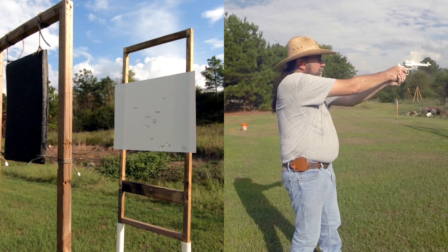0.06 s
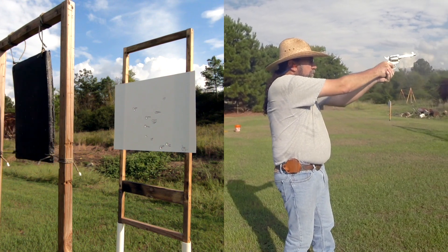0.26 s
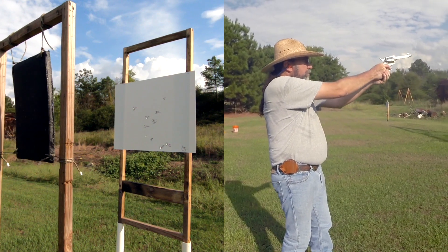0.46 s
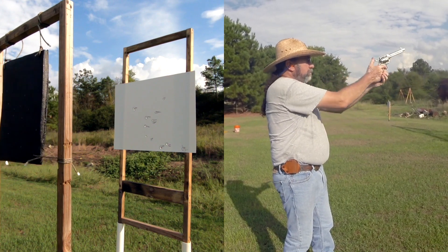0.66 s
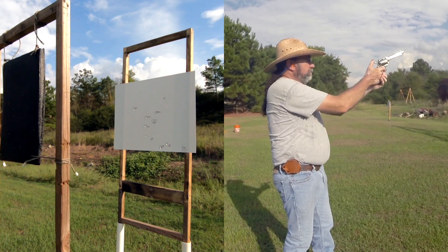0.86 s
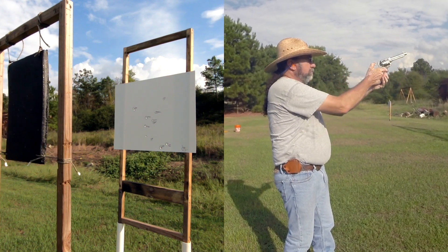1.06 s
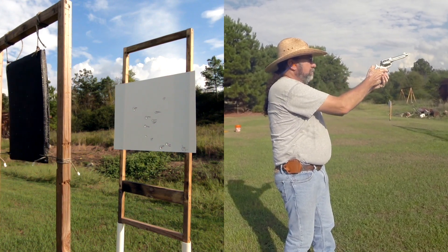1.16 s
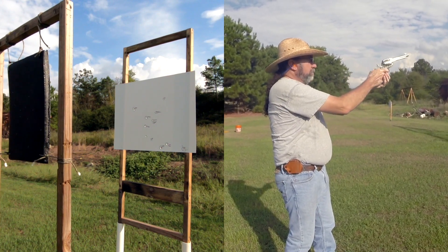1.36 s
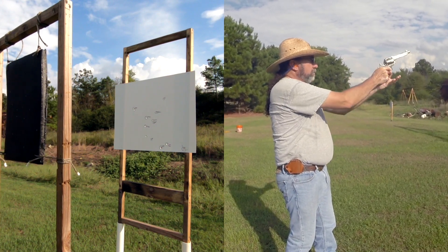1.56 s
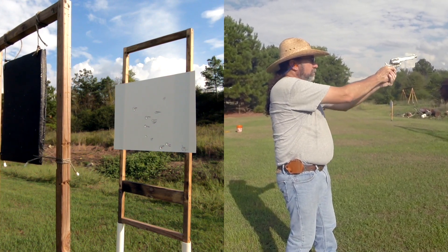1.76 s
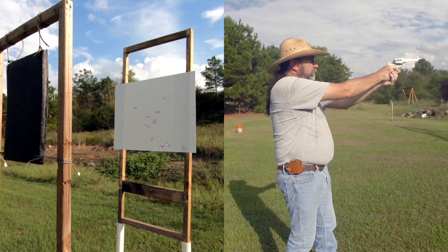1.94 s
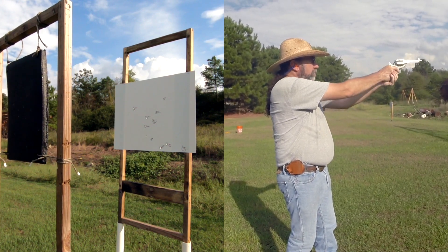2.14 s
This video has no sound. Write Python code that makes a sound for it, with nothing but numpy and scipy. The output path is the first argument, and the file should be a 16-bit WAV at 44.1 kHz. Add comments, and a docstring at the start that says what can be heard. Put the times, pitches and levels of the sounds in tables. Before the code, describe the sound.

One heavy handgun blast on an open range, rough rolling echoes, then faint metallic hammer cocking

```python
"""On an open range, one shot from a large revolver is heard a few metres from a mono camera microphone.
A shock pulse and decaying gas noise form the blast, which a ground reflection and a low roll follow.
Nearby objects return filtered fronts with noise smears; the tree line returns sparse, fading impulses.
Four soft thuds precede the shot; later the hammer is cocked, as damped steel modes with scraping noise.
Filtered noise makes wind, hiss and insects; the recorder ducks, recovers slowly and clips."""
import sys
import numpy as np
from scipy import signal
from scipy.fft import rfft, irfft, next_fast_len
from scipy.io import wavfile
from scipy.ndimage import minimum_filter1d, map_coordinates

SR = 44100
rng = np.random.default_rng(int(sys.argv[2]) if len(sys.argv) > 2 else 0)


def bounce(signal):
    """Save signal as a 16-bit WAV file at the path given by the first command-line argument."""
    frames = np.transpose(np.atleast_2d(signal))
    limited = np.clip(frames, -1, 1)
    pcm = np.round(limited * 32767).astype(np.int16)
    wavfile.write(sys.argv[1], SR, pcm)


N = 97020  # 2.2 s

# Blast colour [f/Hz, level/dB]
BLAST_COLOUR = [(30, 6), (100, 2.5), (220, -3.5), (360, 3), (600, 0), (1000, -1.5), (1600, -9), (2400, 0.5),
                (6000, -4.5), (15000, -32.5)]
# Camera-body modes, relative to the blast [f/Hz, level/dB, T60/s]
BODY_MODES = [(86, -21, 0.017), (363, -7.5, 0.016), (671, -12.5, 0.027), (998, -7.5, 0.02),
              (2260, -15, 0.014)]
# Reflection response of the grassy ground [f/Hz, level/dB]
GROUND_RESPONSE = [(1000, 1), (2500, 1), (10000, -19)]
# Colour of the low roll over the ground [f/Hz, level/dB]
ROLL_COLOUR = [(30, -33), (100, -16.5), (190, -3.5), (300, -10), (600, -24), (2000, -26), (12000, -31)]
# Echoes of distinct objects; level before decay and filtering [t/s, level/dB, reference f/Hz, T60/s]
OBJECT_ECHOES = [(0.2611, 1.5, 752, 0.014), (0.2667, 2, 546, 0.0067), (0.271, -14, 850, .02),
                 (0.3193, -13, 1050, 0.0079), (0.3366, -5, 814, .008), (0.369, -9, 1090, 0.015),
                 (0.3776, -0.5, 1010, 0.004), (.392, -2, 1220, 0.012), (0.416, -4, 1084, 0.043),
                 (0.4275, -22, 1030, 0.025), (0.4707, -13, 1200, 0.039), (0.498, -10, 1180, 0.049),
                 (.513, -8.5, 660, 0.014), (0.53, -4, 560, 0.0067), (.542, -5, 565, 0.056),
                 (.593, -9, 748, 0.032), (.640, -7.5, 490, 0.017), (.654, -11, 583, 0.027),
                 (.692, -12.5, 700, 0.1), (0.726, -10, 496, 0.024), (0.738, -12, 1040, 0.024),
                 (0.791, -20.5, 543, 0.068), (0.8579, -9, 1500, .012), (0.8867, -13, 940, 0.028),
                 (.936, -15, 1000, .035), (.970, -16, 800, .04), (1.026, -18, 1400, .02),
                 (1.149, -18.5, 860, 0.018), (1.482, -28.5, 1020, 0.013), (1.741, -31, 980, .025)]
# Echo spectrum about its reference pitch [multiple of reference f, level/dB]
ECHO_SPECTRUM = [(.2, -26), (.55, -18), (.85, 7.5), (1.2, 2.5), (1.6, -8), (2.3, -11.5), (4, -18), (8, -20),
                 (16, -49)]
# Treble loss on the way back [f/Hz, level/dB]
ECHO_TREBLE_LOSS = [(2500, 0), (6000, -7.5), (10000, -20), (15000, -20)]
# Arrival of the tree scatter, relative to TREES_DB and before the fade [t/s, level/dB]
TREE_ARRIVAL = [(.23, -7), (.30, -20), (.35, -16.5), (.40, -3.5), (.44, -4), (.485, -7.5), (.52, 0.5),
                (.62, 0), (.86, 3.5), (1.15, 1.5), (1.5, -1), (2.2, 2.5)]
# Colour of the tree scatter [f/Hz, level/dB]
TREE_COLOUR = [(60, -15.5), (180, -13.5), (280, -21), (500, -5), (750, -4), (1080, 2), (1450, -8.5),
               (1900, -6.5), (2500, -8), (3100, -15), (3800, -14), (6500, -16.5), (9500, -31), (15000, -68)]
# Fade of the tree scatter, fastest in the treble through air absorption [f/Hz, fade/(dB/s)]
TREE_FADE = [(150, 27), (500, 24.7), (1000, 20.7), (2000, 25.4), (4000, 35.3), (8000, 52)]
# Cocking clicks, with the lower edge of the passband [t/s, level/dB, f/Hz]
COCKING_CLICKS = [(1.1924, -25.5, 4950), (1.2604, -27.5, 2860)]
# Steel-frame modes, relative to the click and before its filter [f/Hz, level/dB, T60/s]
STEEL_MODES = [(3230, 3.5, 0.021), (4550, -9.5, 0.044), (5240, 1, .016), (6140, -2, 0.022),
               (7843, -9, 0.015), (9120, -4.5, 0.02), (11000, -12, 0.018), (13900, -22, .04)]
# Soft thuds before the shot [t/s, peak level/dB]
THUDS = [(0.1011, -30), (0.1111, -19), (0.1228, -18.5), (0.1329, -17.5)]
# Colour of a thud [f/Hz, level/dB]
THUD_COLOUR = [(40, -9), (130, 1), (400, -2.5), (850, -0.5), (1300, -28), (4000, -21), (6000, -40),
               (15000, -54)]
# Wind level at the microphone, before its random wobble [t/s, level/dB]
WIND_LEVEL = [(0, -36.5), (.12, -32), (.19, -41.5), (.29, -53), (.45, -35), (.9, -41), (1.25, -39),
              (1.38, -40), (1.47, -39), (1.62, -42), (1.79, -33), (1.84, -47), (1.95, -39.5), (2.05, -36),
              (2.2, -41.5)]
# Relative spectrum of the wind [f/Hz, level/dB]
WIND_COLOUR = [(15, 1.5), (40, -3), (80, -4), (150, -12.5), (300, -22.5), (800, -48), (3000, -62)]
# Relative spectrum of the field hiss [f/Hz, level/dB]
HISS_COLOUR = [(50, 14), (250, 17), (500, 14), (1000, 9.5), (2000, 3), (3500, -2), (6000, -5), (9000, -4),
               (12500, -7.5), (15000, 7), (15600, -12)]
# Relative spectrum of the insects [f/Hz, level/dB]
INSECT_COLOUR = [(5500, -31), (7300, -4), (8200, -8), (9000, 3), (9800, -8), (12000, -11), (15000, -25)]
# Top-end response of the recorder [f/Hz, level/dB]
RECORDER_TREBLE = [(9000, 0), (13000, -2.5), (15000, -13), (16200, -7)]

# Blast: gas and wash levels are relative to the shock, before the common colour
SHOT_S, SHOT_DB = 0.2288, 22.5
PUSH_S = 0.00044  # overpressure time
GAS_DB, GAS_T60_S = -9, 0.019  # turbulent muzzle gas
WASH_DB, WASH_T60_S = -48.5, 0.38  # scatter off the grass
BOUNCE_DELAY_S, BOUNCE_DB = 0.003, -4.5
ROLL_DB, ROLL_RISE_S, ROLL_T60_S = -18.5, 0.12, 0.87  # level before the swell
# Reflections
FRONT_SHARE = 0.077  # fraction of an echo's energy in its clean front
TREES_DB, FADE_START_S = -13, 0.41
TWIGS_PER_S, TREE_FLUTTER_DB = 5000, 1
# Cocking
SCRAPE_DB, SCRAPE_T60_S, CLICK_RISE_S = 10.5, 0.014, 0.0012
# Background
HISS_DB, INSECTS_DB, INSECT_FLUTTER_DB = -43.5, -53, 3
# Recorder
THRESHOLD_DB, DEEPEST_DB = -5, 15
GAIN_TIME_CONSTANT_S, HOLD_S, RECOVER_DB_PER_S = 0.00435, 0.39, 22.5
CEILING, TOP_HZ = 0.97, 16200


def amp(db):
    """A level in decibels corresponds to this amplitude ratio."""
    return 10 ** (np.asarray(db) / 20)


def unit(x):
    """Normalization to unit root-mean-square amplitude."""
    return x / np.sqrt(np.mean(x ** 2) + 1e-20)


def along(points, hz):
    """Linear interpolation of (f, value) points over logarithmic frequency."""
    f, value = np.transpose(points)
    return np.interp(np.log(hz + 1e-3), np.log(f), value)


def curve(points):
    """Linear interpolation of (t, value) points, one value per sample."""
    return np.interp(np.arange(N) / SR, *np.transpose(points))


def wobble(rate):
    """Spline interpolation of random knots, rate knots per second."""
    knots = rng.standard_normal(int(N * rate / SR) + 4)
    return map_coordinates(knots, [np.arange(N) * rate / SR])


def coloured(x, points):
    """Minimum-phase filtering: a folded cepstrum gives a causal response of the stated magnitude."""
    m = 2 * next_fast_len(len(x))
    hz = np.fft.rfftfreq(m, 1 / SR)
    cepstrum = irfft(np.log(amp(along(points, hz))))
    cepstrum[1:m // 2] *= 2
    cepstrum[m // 2 + 1:] = 0
    response = np.exp(rfft(cepstrum))
    return irfft(rfft(x, m) * response)[:len(x)]


def dying(t, t60):
    """Exponential decay, reaching -60 dB after t60 seconds."""
    return np.exp(-np.log(1000) * t / t60)


def placed(x, s):
    """Time shift: x starts s seconds into the scene."""
    return np.pad(x, (max(round(s * SR), 0), N))[:N]


def shot():
    """Blast-wave principle: over- then underpressure, with turbulent gas, modal ring and ground reflection."""
    t = np.arange(SR // 3) / SR
    shock = (1 - t / PUSH_S) * np.exp(-t / PUSH_S)
    turbulence = amp(GAS_DB) * dying(t, GAS_T60_S) + amp(WASH_DB) * dying(t, WASH_T60_S)
    gas = rng.standard_normal(len(t)) * turbulence
    body_ring = sum(
        amp(db) * np.sin(2 * np.pi * hz * t) * dying(t, t60)
        for hz, db, t60 in BODY_MODES
    )
    blast = coloured(shock + gas, BLAST_COLOUR)
    direct = placed(blast + body_ring, SHOT_S)
    reflected = placed(coloured(blast, GROUND_RESPONSE), SHOT_S + BOUNCE_DELAY_S)
    return -amp(SHOT_DB) * (direct + amp(BOUNCE_DB) * reflected)  # inverted polarity


def ground_roll():
    """Rise and exponential decay: filtered noise rolls across the field after the bang."""
    t = np.arange(N) / SR
    swell = (1 - np.exp(-t / ROLL_RISE_S)) * dying(t, ROLL_T60_S)
    rumble = unit(coloured(rng.standard_normal(N), ROLL_COLOUR))
    return placed(amp(ROLL_DB) * swell * rumble, SHOT_S)


def echoes():
    """Discrete reflection: each object returns a band-limited front and a decaying noise smear."""
    t, out = np.arange(SR // 8) / SR, np.zeros(N)
    for s, db, reference_hz, t60 in OBJECT_ECHOES:
        spectrum = [(reference_hz * multiple, level) for multiple, level in ECHO_SPECTRUM]
        decay = dying(t, t60)
        front = unit(coloured(signal.unit_impulse(len(t)), spectrum))
        smear = unit(coloured(rng.standard_normal(len(t)) * decay, spectrum))
        # Weights add in energy
        echo = np.sqrt(FRONT_SHARE) * front + np.sqrt(1 - FRONT_SHARE) * smear
        decay_rms = np.sqrt(np.mean(decay ** 2))
        out += placed(amp(db) * echo * decay_rms, s)
    return coloured(out, ECHO_TREBLE_LOSS)


def tree_line():
    """Diffuse scattering: sparse random reflections fade at a rate that depends on frequency."""
    twigs = rng.standard_normal(N) * (rng.random(N) < TWIGS_PER_S / SR)
    hz, t, spectrum = signal.stft(unit(coloured(twigs, TREE_COLOUR)), SR, nperseg=256)
    fade_db = -along(TREE_FADE, hz)[:, None] * np.maximum(t - FADE_START_S, 0)
    scatter = signal.istft(spectrum * amp(fade_db), SR, nperseg=256)[1][:N]
    level_db = TREES_DB + curve(TREE_ARRIVAL) + TREE_FLUTTER_DB * wobble(70.23)
    after_shot = np.arange(N) > SHOT_S * SR
    return scatter * amp(level_db) * after_shot


def cocking():
    """Modal vibration: hammer and cylinder catch scrape and ring the steel frame."""
    t, out = np.arange(SR // 8) / SR, np.zeros(N)
    for s, db, low_hz in COCKING_CLICKS:
        ring = sum(
            amp(level) * np.sin(2 * np.pi * (hz * t + rng.random())) * dying(t, t60)
            for hz, level, t60 in STEEL_MODES
        )
        scrape = amp(SCRAPE_DB) * rng.standard_normal(len(t)) * dying(t, SCRAPE_T60_S)
        click = (ring + scrape) * (1 - np.exp(-t / CLICK_RISE_S))
        passband = [(low_hz * 0.79, -22), (low_hz, 0), (9500, 0), (14000, -8), (16000, -22)]
        out += placed(amp(db) * coloured(click, passband), s)
    return out


def stutter():
    """Impulse response: one filtered impulse, repeated as four soft, quick thuds."""
    thud = coloured(signal.unit_impulse(SR // 20), THUD_COLOUR)
    thud = thud / np.abs(thud).max()
    return sum(placed(amp(db) * thud, s) for s, db in THUDS)


def wind():
    """Level-modulated low-frequency noise: light wind rumbles on the microphone."""
    rumble = unit(coloured(rng.standard_normal(N), WIND_COLOUR))
    return rumble * amp(curve(WIND_LEVEL) + 2.3 * wobble(9.7))


def field_hiss():
    """Broadband noise with slight random level modulation: the hiss of the field."""
    hiss = unit(coloured(rng.standard_normal(N), HISS_COLOUR))
    return hiss * amp(HISS_DB + 1.2 * wobble(12.08))


def insects():
    """Band-limited noise with fast random level modulation: a thin, fluttering insect buzz."""
    buzz = unit(coloured(rng.standard_normal(N), INSECT_COLOUR))
    return buzz * amp(INSECTS_DB + INSECT_FLUTTER_DB * wobble(60.34))


def scene():
    """Superposition: all sources add at one microphone, feeding two identical channels."""
    blast = shot() + ground_roll()
    reflections = echoes() + tree_line()
    handling = cocking() + stutter()
    background = wind() + field_hiss() + insects()
    return np.tile(blast + reflections + handling + background, (2, 1))


def record(dry):
    """Automatic gain control and saturation: gain ducks, holds and recovers; remaining peaks clip."""
    t = np.arange(N) / SR
    level_db = 20 * np.log10(np.abs(dry[0]) + 1e-9)
    excess_db = np.clip(level_db - THRESHOLD_DB, 0, DEEPEST_DB)
    # Running maximum over the preceding hold time
    hold = 2 * int(HOLD_S * SR / 2) + 1
    held_db = -minimum_filter1d(-excess_db, hold, origin=hold // 2, mode="constant")
    # The reduction may fall no faster than the recovery slope
    slope_db = RECOVER_DB_PER_S * t
    duck_db = np.maximum.accumulate(held_db + slope_db) - slope_db
    pole = np.exp(-1 / (GAIN_TIME_CONSTANT_S * SR))
    smooth_duck_db = signal.lfilter([1 - pole], [1, -pole], duck_db)
    clipped = np.clip(dry * amp(-smooth_duck_db), -CEILING, CEILING)
    filtered = np.array([coloured(channel, RECORDER_TREBLE) for channel in clipped])
    lowpass = signal.firwin(255, TOP_HZ, fs=SR, window="blackman")
    return signal.fftconvolve(filtered, lowpass[None], mode="same", axes=1)


dry = scene()
out = record(dry)
bounce(out)
```